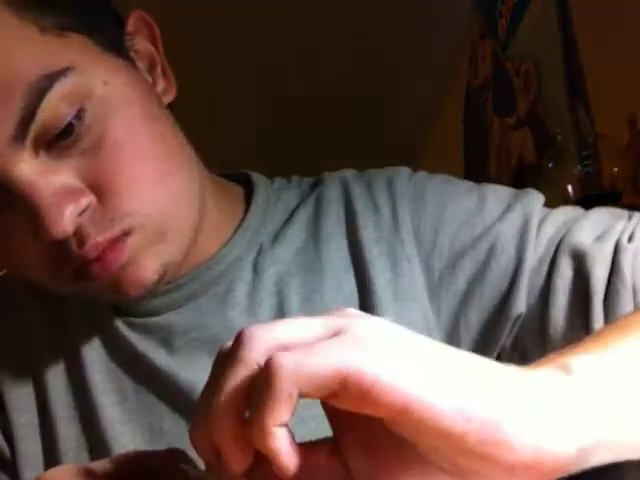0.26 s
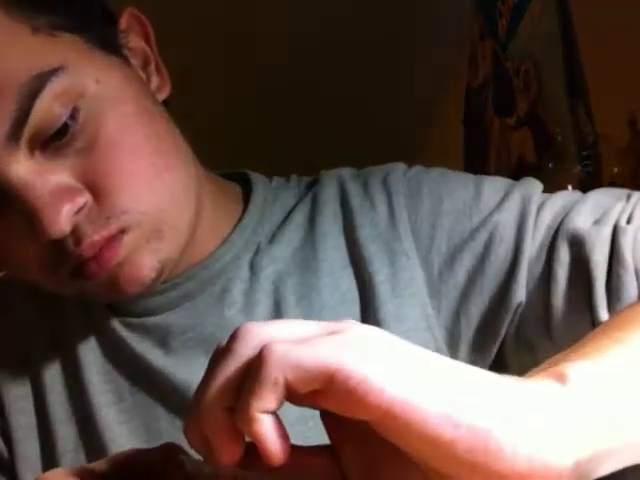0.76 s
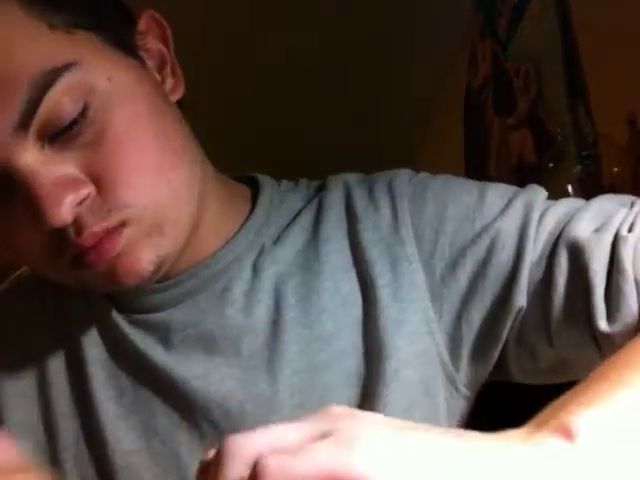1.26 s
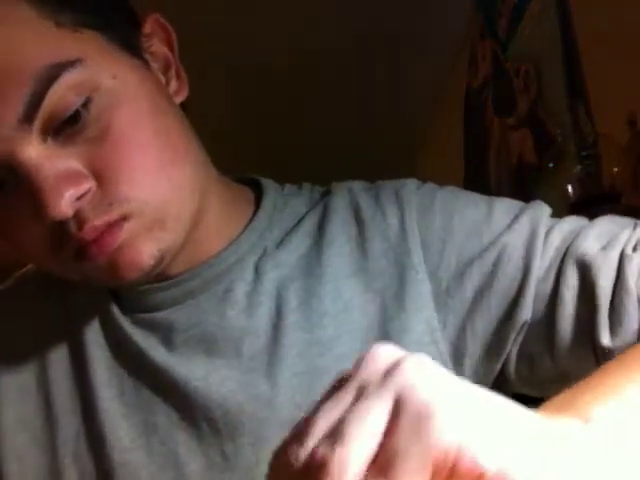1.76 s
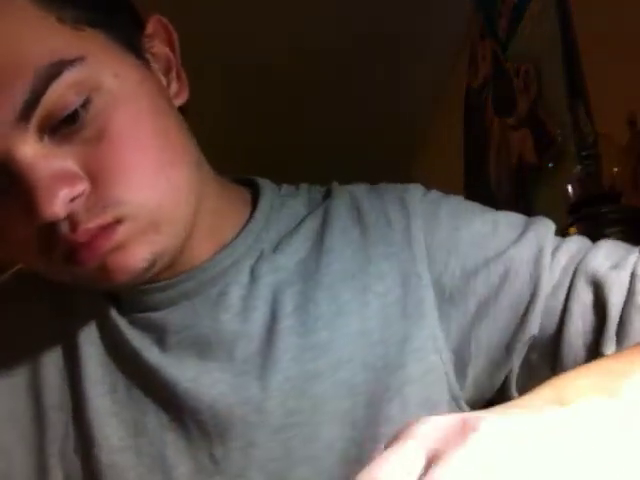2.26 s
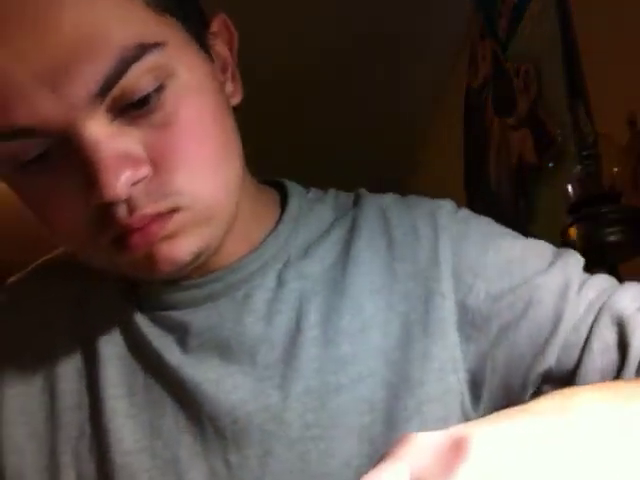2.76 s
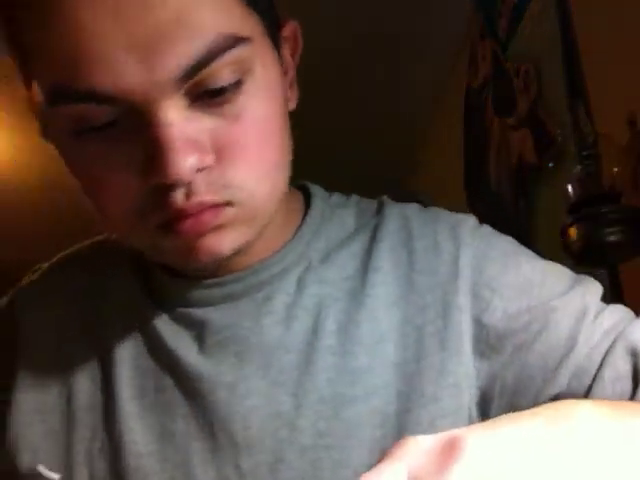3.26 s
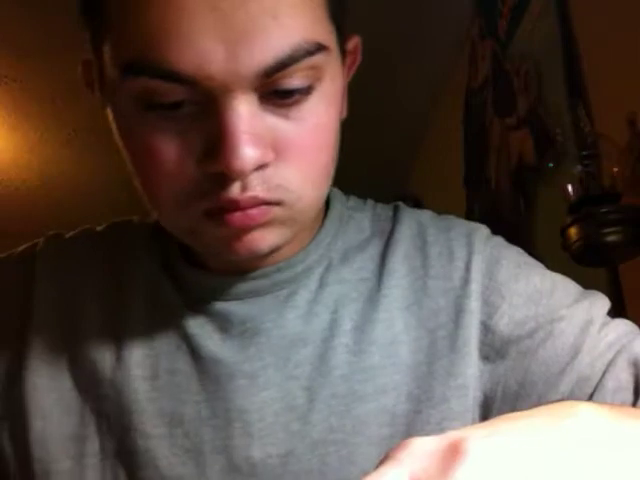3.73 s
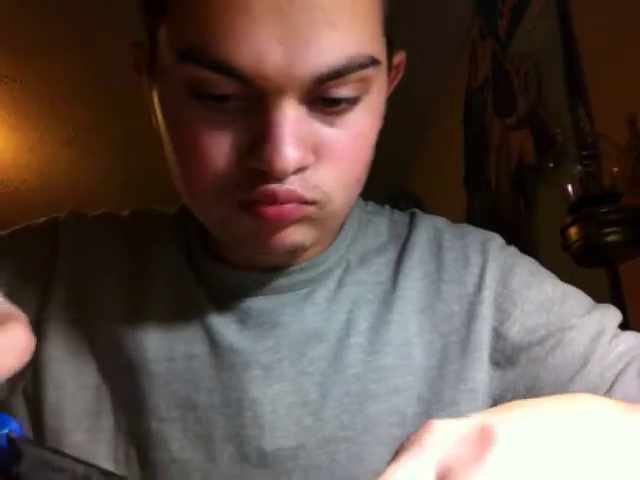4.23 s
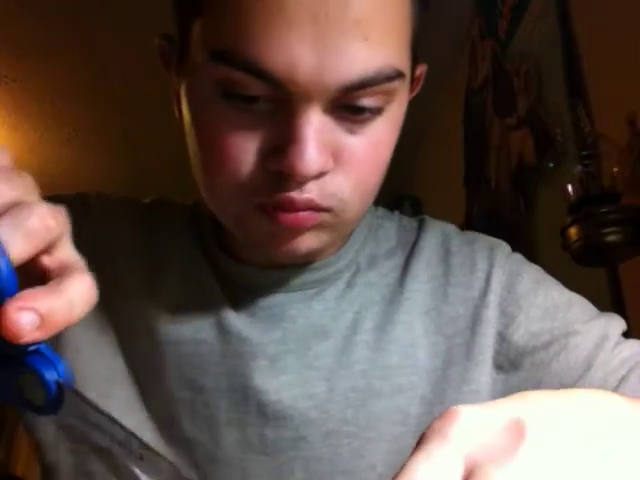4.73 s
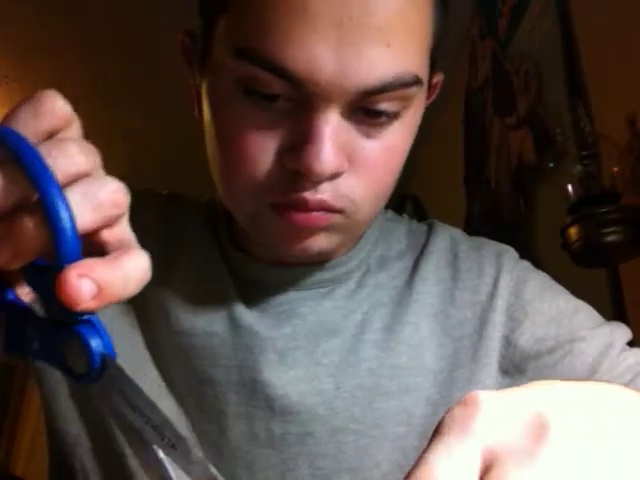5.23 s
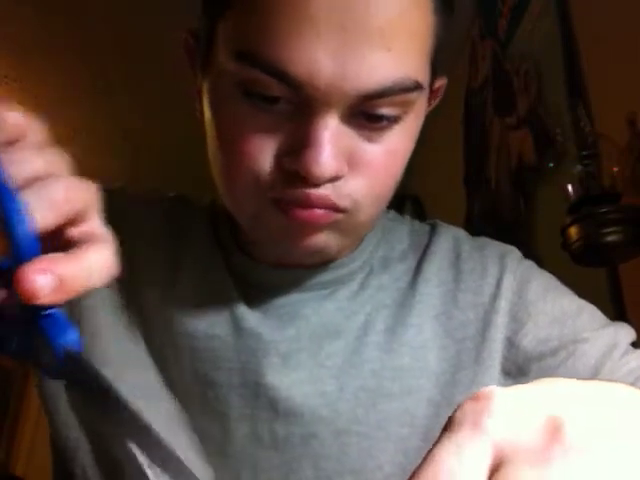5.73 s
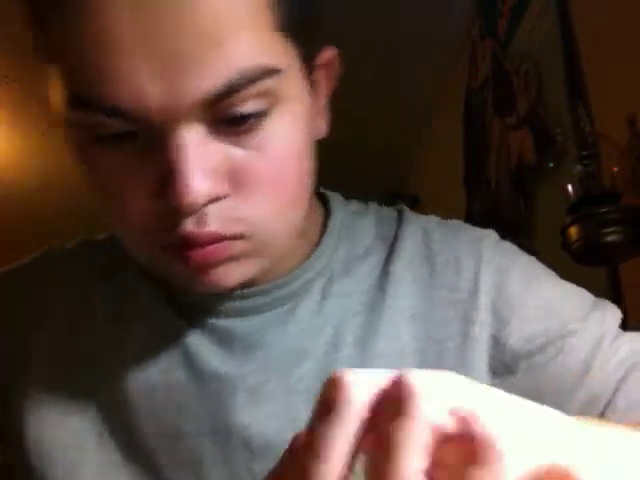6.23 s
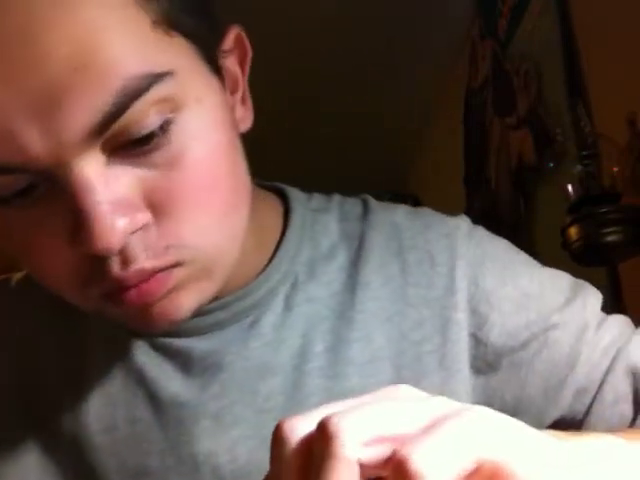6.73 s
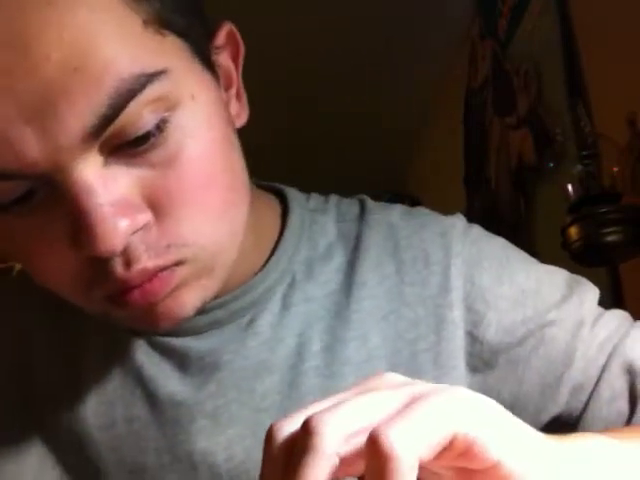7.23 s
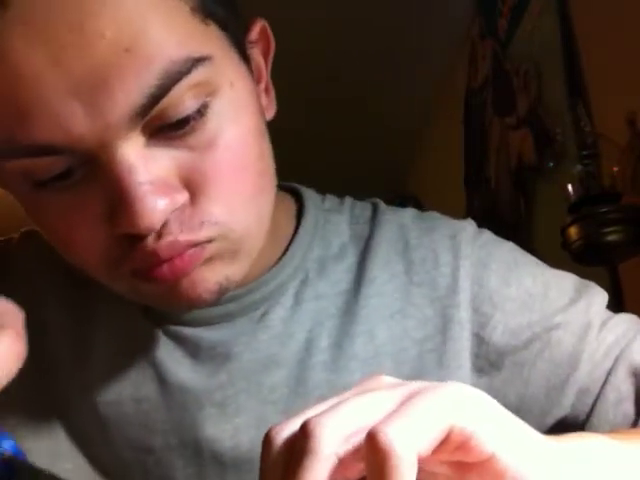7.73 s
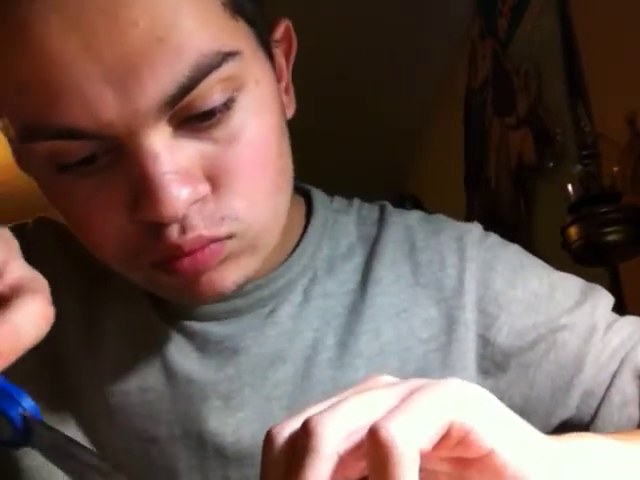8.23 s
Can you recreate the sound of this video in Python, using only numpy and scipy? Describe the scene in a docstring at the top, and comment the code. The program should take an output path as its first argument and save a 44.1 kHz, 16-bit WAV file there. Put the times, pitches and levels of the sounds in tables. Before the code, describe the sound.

Scissors crack stiff plastic packaging beside a bumped desk, followed by rubbing, light knocks and small isolated snips in a quietly humming room.

```python
"""Thumps, loud snaps, scraping and sparse clicks: scissors work on stiff plastic packaging at a desk.
The package bumps the desk, snaps, slides and is knocked down; then the blades nip at it.
Knocks and snips are noise cracks plus struck modes; sliding is dense random catches, coloured.
A small room adds a noise tail; a fan and the mains hum as wandering tones under microphone hiss."""
import sys
import numpy as np
from scipy import signal
from scipy.fft import rfft, irfft
from scipy.io import wavfile

SR = 44100
rng = np.random.default_rng(int(sys.argv[2]) if len(sys.argv) > 2 else 0)


def transcribe(u):
    """Save the signal u as a 16-bit wav file named by the first command-line argument.

    u: samples, shape (n,) or (channels, n), limited to [-1, 1]; the rate is SR.
    q: integer samples, one column per channel.
    """
    v = np.clip(np.atleast_2d(u).T, -1, 1)
    q = np.round(v * 32767).astype(np.int16)
    wavfile.write(sys.argv[1], SR, q)


N = 374409

# Snaps and nips of blades and plastic. Each row: start in seconds, level in dB (rms of the first 5 ms),
# tilt in dB per octave, pitch ratio of the modes.
SNIPS = [(1.2217, -29.5, 0, 0.95), (1.537, -47.5, 17, 1.13), (1.6004, -41, 6, 0.38), (1.716, -36, -1, 1),
         (1.73, -15, 2, 0.97), (3.4503, -49, 11, 0.72), (4.1566, -51.5, -1, 1.3), (4.85, -46, -6, 1.03),
         (5.3142, -49.5, -4, 0.9), (5.6378, -48, -5, 0.79), (5.675, -40.5, 11, 0.88),
         (5.68, -36.5, -3.5, 2.9), (6.142, -50.5, -14, 1.2), (6.6981, -46, -3, 0.84),
         (6.9257, -45.5, -4, 1.1), (6.9677, -52, -8, 0.93), (7.5058, -33.5, 3.5, 0.96),
         (7.6127, -50.5, 3, 1.3), (7.8784, -53, -1, 0.87), (7.9427, -48, -3.5, 0.86),
         (8.3356, -53.5, -1, 0.78)]
# What follows a hard snap as the cut runs on and the sheet springs back. Each row: delay in seconds,
# level relative to the snap in dB, added tilt in dB per octave, pitch ratio.
AFTERSNAPS = [(0.0016, -10.5, 7, 0.79), (0.0092, -28, 11, 0.95)]
HARD_SNAP_DB = -39   # snaps above this cut through the sheet
# Modes of scissors gripping the sheet. Each row: frequency in Hz, relative level in dB, T60 in seconds.
BLADE_MODES = [(990, -11, 0.014), (1199, 2, 0.034), (1581, 3, 0.019), (1940, 12, 0.0037), (2460, -5, 0.028),
               (2770, 2, 0.0061), (2950, 15, 0.0048), (3456, 6, 0.014), (3940, 0, 0.0053),
               (5200, -17.5, 0.028), (6300, -3, 0.01), (7940, -19, 0.015), (9460, -16.5, 0.022)]
# Steel blade left ringing by a snip. Each row: start in seconds, peak level in dB, frequency in Hz,
# T60 in seconds.
BLADE_PINGS = [(1.7305, -22, 5180, .028), (3.4512, -46, 2900, 0.049), (4.1566, -51, 3710, .04),
               (5.6791, -32, 5140, 0.03), (5.6795, -37, 3790, .03), (6.9258, -52, 3400, .03),
               (7.5059, -30.5, 3780, 0.021), (7.6127, -50, 3650, 0.036)]

# Single knocks of the package on the desk. Each row: start in seconds, package level in dB,
# tilt in dB per octave, pitch ratio, desk level in dB, contact bandwidth in Hz.
KNOCKS = [(1.210, -36, -5, 0.86, -62, 700), (1.6051, -19.5, -3, 0.92, -38, 1510),
          (1.737, -45, -6, 1, -38, 380), (1.836, -62, -8, 1, -46, 350), (1.882, -41.5, -13, 1.02, -54, 866),
          (2.233, -59, -7, 0.91, -48.5, 500), (2.5626, -37, -13, 1.2, -58, 900),
          (2.596, -35.5, -19, 1.2, -57, 900), (2.7384, -26, -0.5, 0.99, -35, 422),
          (2.888, -55.5, -6, 1, -47.5, 350), (4.391, -51, -4, 1, -50.5, 500),
          (6.353, -49.5, -3.5, 0.8, -52, 900), (7.505, -45, -1, 1.22, -50, 1500),
          (7.9427, -48.5, -5, 0.86, -50, 1300), (8.2241, -52, -9, 0.91, -54, 700),
          (8.335, -52.5, 3, 0.94, -51.5, 700)]
# Modes of the package body. Each row: frequency in Hz, relative level in dB, T60 in seconds.
PACKAGE_MODES = [(698, -14.5, 0.047), (935, -9.5, 0.044), (1077, 5.5, 0.022), (1182, 0.5, 0.028),
                 (1292, 1.5, 0.023), (1917, 0.5, 0.033), (2996, 6.5, 0.012), (3190, 1, 0.012),
                 (3850, -3.5, 0.019), (4360, 0, 0.011), (5780, -20, 0.012)]
# Crack of a contact. Each row: frequency in Hz, relative density in dB per Hz.
CRACK_SPECTRUM = [(200, -16), (600, 8.5), (1100, 12), (3000, 5.5), (4500, 7.5), (8000, -2), (11000, -10),
                  (16000, -28)]
# What a contact sends out over all directions. Each row: frequency in Hz, relative density in dB per Hz.
RADIATED_SPECTRUM = [(200, -6), (600, -3.5), (1000, 5), (3200, 0), (4200, -5.5), (5400, -3.5), (6800, -9),
                     (10000, -12), (16000, -31)]

# The package lands and rocks from edge to edge. Each row: start in seconds, desk level in dB,
# contact bandwidth in Hz, package level in dB, crinkle level in dB, desk loss per rock in dB.
LANDINGS = [(1.2249, -14.5, 423, -23.5, -37.5, 1), (1.6147, -23, 1300, -33, -51, 9)]
# Modes of the desk top. Each row: frequency in Hz, relative level in dB, T60 in seconds.
DESK_MODES = [(54.5, -36, 0.35), (109, -14, 0.22), (149.2, -7, 0.18), (178, -36, 0.4), (250, -3, 0.18),
              (269, 3.5, 0.082), (323, -21, 0.47), (368, 0.5, 0.11), (467.7, -9.5, 0.29),
              (531, -2.5, 0.091), (613, -6, 0.14), (711, -2.5, 0.066), (851, -5, 0.057), (960, -13, 0.023)]
ROCK_S = 0.0093   # edge to edge
FAR_EDGE_EARLY_S, FAR_EDGE_DB = 0.0008, -11   # the far edge touches sooner, and lighter on the desk
ROCK_KNOCK_LOSS_DB, ROCK_CRINKLE_LOSS_DB = 5.5, 2   # per rock
ROCK_TILT_DB_PER_OCT, ROCK_PITCH_RATIO = -7.5, 1.15   # package modes under load; pitch is also scattered
CRINKLE_MAX_LAG_S = 0.003   # the sheet crinkles as the weight leaves an edge, up to this much later
CRINKLE_TILT_DB_PER_OCT = 12

# Pushes of the package under the hand. Each row: peak time in seconds, rise in seconds, fall in seconds,
# friction level in dB, surface hiss level relative to the friction in dB.
PUSHES = [(1.25, 0.14, 0.184, -44.5, -2), (1.64, 0.3, 0.11, -52, -0.5), (1.89, 0.11, 0.21, -49, -5.5),
          (2.27, 0.096, 0.2, -51.5, -5), (2.385, 0.21, 0.18, -51, -4), (2.5, 0.15, 0.3, -46.5, -10),
          (2.604, 0.12, 0.032, -39, -13.5), (2.885, 0.1, 0.06, -55, -6), (5.69, 0.05, 0.13, -52, 1.5),
          (6.08, 0.09, 0.1, -52, -2.5), (7.5, 0.4, 0.087, -57, -2), (7.62, 0.064, 0.071, -56, -11)]
# Friction through the package. Each row: frequency in Hz, relative density in dB per Hz.
FRICTION_SPECTRUM = [(60, -34), (150, -6), (300, 1.5), (620, -5), (800, -1), (1300, -5), (1650, -9.5),
                     (2100, -37), (4000, -25), (16000, -36)]
# Friction at its surface. Each row: frequency in Hz, relative density in dB per Hz.
SURFACE_SPECTRUM = [(800, -15), (2500, -5.5), (5000, -7.5), (8000, -11.5), (12000, -13), (16000, -18)]
PUSH_SLOPE_DB = 19.5   # change per rise time before the peak and per fall time after it
HOLD_DB = -70.5   # friction of the package merely held
SNAG_SLOTS_PER_S, SNAG_ABOVE_DB = 70, -50.5   # one possible snag per slot; gentler pushes do not snag
SNAG_DB, SNAG_SPREAD_DB, SNAG_TILT_DB_PER_OCT = -3.5, 6, -10.5   # relative to friction, +/- scatter, tilt

# Room reverberation. Each row: frequency in Hz, T60 in seconds.
ROOM_T60 = [(100, 0.64), (400, 0.57), (1500, 0.34), (5000, 0.38), (14000, 0.27)]
# Mains, fan and electronics. Each row: frequency in Hz, level in dB, rms pitch wander in Hz.
HUM_TONES = [(117, -71, 0.84), (128.6, -68.5, 1.234), (275.5, -56.5, 1.34), (349, -69.5, 0.87),
             (424, -76, 0.68), (590, -97, 1.5), (840, -86, 0.93), (1115, -78.5, 1.87), (15280, -86, 0.91)]
# Room air and microphone hiss. Each row: frequency in Hz, density in dB per Hz.
FLOOR_SPECTRUM = [(20, -99), (60, -91.5), (100, -89), (130, -85), (200, -87.5), (275, -79.5), (320, -88),
                  (450, -87), (620, -92), (1150, -96.5), (2000, -97.5), (5000, -99), (9500, -98),
                  (15500, -101)]
CUTOFF_HZ = 15850


def from_db(db):
    """Decibels to gain."""
    return 10 ** (np.asarray(db) / 20)


def rms_one(x):
    """Scale to rms 1."""
    return x / np.sqrt(np.mean(x ** 2) + 1e-20)


def unit_attack(x):
    """Scale a hit to rms 1 over its first 5 ms."""
    return x / np.sqrt(np.mean(x[:SR // 200] ** 2) + 1e-20)


def at_hz(points, hz):
    """Read a table on a log-frequency axis."""
    table_hz, value = np.transpose(points)
    return np.interp(np.log(np.maximum(hz, 1)), np.log(table_hz), value)


def colour(x, spectrum, tilt_db=0):
    """Give x a spectrum, tilted per octave about 2 kHz; the tilt stops changing below 500 Hz."""
    hz = np.maximum(np.fft.rfftfreq(len(x), 1 / SR), 1)
    octaves = np.log2(np.maximum(hz, 500) / 2000)
    gain = from_db(at_hz(spectrum, hz) + tilt_db * octaves)
    return irfft(rfft(x) * gain, len(x))


def drift(rate_hz):
    """Random curve of rms 1, linear between rate_hz knots a second."""
    place = np.arange(N) / SR * rate_hz
    knots = rng.standard_normal(20000)
    return rms_one(np.interp(place, np.arange(len(knots)), knots))


def add(out, start_s, sound):
    """Mix a sound in at start_s."""
    start = int(round(start_s * SR))
    out[start:start + len(sound)] += sound[:N - start]


def ring(modes, t, tilt_db=0, pitch=1):
    """Struck modes: a sharper contact favours the high ones, bending and grip shift their pitch."""
    hz, db, t60 = np.transpose(modes)[:, :, None]
    hz = hz * pitch
    db = db + tilt_db * np.log2(hz / 2000)
    signs = (-1) ** np.arange(len(hz))[:, None]
    decay = from_db(db - 60 * t / t60)
    return np.sum(signs * decay * np.sin(2 * np.pi * hz * t), axis=0)


def burst(spectrum, tilt_db, t60, t):
    """Coloured noise that dies quickly."""
    noise = colour(rng.standard_normal(len(t)), spectrum, tilt_db)
    return unit_attack(noise * np.exp(-np.log(1000) * t / t60))


def contacts(events, modes, crack_db, crack_t60):
    """Hard contact: a crack plus body modes; summed over all directions, a plain smooth click."""
    direct, spread = np.zeros(N), np.zeros(N)
    t = np.arange(8192) / SR
    click = signal.unit_impulse(len(t), SR // 500)   # 2 ms in, as colour() also spreads it backwards
    for start_s, db, tilt_db, pitch in events:
        body = unit_attack(ring(modes, t, tilt_db, pitch))
        hit = body + from_db(crack_db) * burst(CRACK_SPECTRUM, tilt_db, crack_t60, t)
        radiated = colour(click, RADIATED_SPECTRUM, tilt_db)[:len(t) // 2]
        add(direct, start_s, from_db(db) * unit_attack(hit))
        add(spread, start_s, from_db(db) * unit_attack(radiated))
    return direct, spread


def snapping():
    """Hard snaps are followed by weaker aftersnaps; light nips stay single."""
    events = list(SNIPS)
    for start_s, db, tilt_db, pitch in SNIPS:
        if db > HARD_SNAP_DB:
            for delay_s, after_db, added_db, ratio in AFTERSNAPS:
                events.append((start_s + delay_s, db + after_db, tilt_db + added_db, pitch * ratio))
    return events


def blade_ringing():
    """Some snips leave damped notes in the steel."""
    out, t = np.zeros(N), np.arange(SR // 4) / SR
    for start_s, db, hz, t60 in BLADE_PINGS:
        add(out, start_s, from_db(db) * ring([(hz, 0, t60)], t))
    return out


def rocking(count=4):
    """A landing pushes the desk one way, then the other; rocking from edge to edge loses force."""
    blows, knocks, crinkles = [], [], []
    for start_s, desk_db, contact_hz, package_db, crinkle_db, loss_db in LANDINGS:
        for k in range(count):
            far = k % 2
            at_s = start_s + k * ROCK_S - far * FAR_EDGE_EARLY_S
            blow_db = desk_db - k * loss_db + far * FAR_EDGE_DB
            blows.append((at_s, blow_db, contact_hz, (-1) ** k))
            knock_db = package_db - k * ROCK_KNOCK_LOSS_DB
            knock_pitch = ROCK_PITCH_RATIO * rng.uniform(0.89, 1.13)
            knocks.append((at_s, knock_db, ROCK_TILT_DB_PER_OCT, knock_pitch))
            leave_s = at_s + ROCK_S + CRINKLE_MAX_LAG_S * rng.random()
            sheet_db = crinkle_db - k * ROCK_CRINKLE_LOSS_DB
            crinkles.append((leave_s, sheet_db, CRINKLE_TILT_DB_PER_OCT, rng.uniform(0.68, 1.5)))
    return blows, knocks, crinkles


def desk(blows, lowest_hz=55):
    """Soft blows set the desk booming; a longer contact leaves only its low modes."""
    out, boom = np.zeros(N), ring(DESK_MODES, np.arange(SR // 2) / SR)
    for start_s, db, contact_hz, direction in blows:
        softened = signal.sosfilt(signal.butter(2, contact_hz, fs=SR, output="sos"), boom)
        add(out, start_s, direction * from_db(db) * unit_attack(softened))
    # a thin top radiates little deep bass
    return signal.sosfilt(signal.butter(1, lowest_hz, "high", fs=SR, output="sos"), out)


def pushing():
    """Gains of friction and surface hiss: each push swells to its peak and fades."""
    t, friction, hiss = np.arange(N) / SR, from_db(HOLD_DB), 0
    for peak_s, rise_s, fall_s, db, hiss_db in PUSHES:
        away = np.maximum((peak_s - t) / rise_s, (t - peak_s) / fall_s)
        push = from_db(db - PUSH_SLOPE_DB * np.minimum(away, 10))
        friction = np.maximum(friction, push)
        hiss = np.maximum(hiss, push * from_db(hiss_db))
    return friction, hiss


def sliding(friction, hiss, catches_per_s=3500, size_db=3.0, judder_db=1.55):
    """Plastic catches and slips in dense tiny jerks that sound through the package."""
    sizes = from_db(size_db * np.minimum(rng.exponential(1, N), 4)) * rng.choice([-1, 1], N)
    catches = sizes * (rng.random(N) < catches_per_s / SR)
    body = friction * rms_one(colour(catches, FRICTION_SPECTRUM))
    surface = hiss * rms_one(colour(rng.standard_normal(N), SURFACE_SPECTRUM))
    judder = rms_one(from_db(judder_db * drift(240)))
    return (body + surface) * judder


def snagging(friction):
    """Larger catches of an edge of the sliding package, as hard as it is pushed."""
    chance = rng.random((int(N / SR * SNAG_SLOTS_PER_S), 3))
    times_s = (np.arange(len(chance)) + chance[:, 0]) / SNAG_SLOTS_PER_S
    push_db = 20 * np.log10(np.interp(times_s * SR, np.arange(N), friction))
    events = []
    for at_s, db, (_, size, bend) in zip(times_s, push_db, chance):
        if db > SNAG_ABOVE_DB:
            snag_db = db + SNAG_DB + SNAG_SPREAD_DB * (2 * size - 1)
            events.append((at_s, snag_db, SNAG_TILT_DB_PER_OCT, 0.86 + 0.47 * bend))
    return events


def nearby(x, reflect_db, t60=0.048):
    """Add quick reflections off the desk, hands and body, as decaying noise from 2 ms on."""
    t = np.arange(4096) / SR
    response = rng.standard_normal(len(t)) * np.exp(-np.log(1000) * t / t60) * (t > 0.002)
    reflected = signal.fftconvolve(x, response / np.linalg.norm(response))[:N]
    return x + from_db(reflect_db) * reflected


def room(x, full_after_s=0.018):
    """Diffuse noise tail whose bands decay by ROOM_T60; it fades in from half of full_after_s."""
    t = np.arange(SR // 2) / SR
    white, tail = rng.standard_normal((2, len(t))), 0
    edges_hz = np.geomspace(60, 17000, 10)
    for k, (low, high) in enumerate(zip(edges_hz, edges_hz[1:])):
        band_filter = signal.butter(2, [low, high], "band", fs=SR, output="sos")
        band = signal.sosfilt(band_filter, white[k % 2])   # neighbouring bands use different noise
        t60 = at_hz(ROOM_T60, np.sqrt(low * high))
        tail = tail + band * np.exp(-np.log(1000) * t / t60)
    tail = tail * np.clip(2 * t / full_after_s - 1, 0, 1)
    return signal.fftconvolve(x, tail / np.linalg.norm(tail))[:N]


def hum(waver_db=-2.0):
    """Steady tones that wander a little in pitch and level."""
    out = np.zeros(N)
    for hz, db, wander_hz in HUM_TONES:
        phase = 2 * np.pi * np.cumsum(hz + wander_hz * drift(8)) / SR
        level = from_db(db + waver_db * drift(6.7))
        out += level * np.sqrt(2) * np.sin(phase)
    return out


def air_and_hiss():
    """Steady noise of room air and microphone."""
    return colour(rng.standard_normal(N), FLOOR_SPECTRUM) * np.sqrt(SR / 2)   # white at 0 dB per Hz


def scene():
    """Handling and cutting in the room, over hum and hiss."""
    background = hum() + air_and_hiss()
    friction, hiss = pushing()
    slide, pings = sliding(friction, hiss), blade_ringing()

    rock_blows, rock_knocks, crinkles = rocking()
    single_blows = [(at_s, desk_db, contact_hz, 1) for at_s, _, _, _, desk_db, contact_hz in KNOCKS]
    thumps = desk(rock_blows + single_blows)

    snips, snip_spread = contacts(snapping() + crinkles, BLADE_MODES, crack_db=1.0, crack_t60=0.022)
    snips = nearby(snips, reflect_db=-11.0)
    knock_events = [row[:4] for row in KNOCKS] + rock_knocks + snagging(friction)
    knocks, knock_spread = contacts(knock_events, PACKAGE_MODES, crack_db=-8.5, crack_t60=0.023)
    direct = thumps + slide + pings + snips + nearby(knocks, reflect_db=-9.0)

    # blows on the desk reach the microphone through the wood, so they are drier than the snips
    desk_to_room = from_db(-19) * thumps + from_db(-19) * knocks + from_db(-21.5) * knock_spread
    air_to_room = from_db(-15.5) * snip_spread + from_db(-20) * pings + from_db(-14.5) * slide
    return (direct + room(desk_to_room + air_to_room) + background)[None]


def record(dry):
    """Cut the top steeply with an elliptic low-pass."""
    return signal.sosfilt(signal.ellip(12, 0.1, 80, CUTOFF_HZ, fs=SR, output="sos"), dry)


dry = scene()
out = record(dry)
transcribe(out)
```